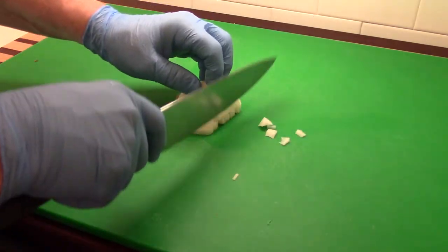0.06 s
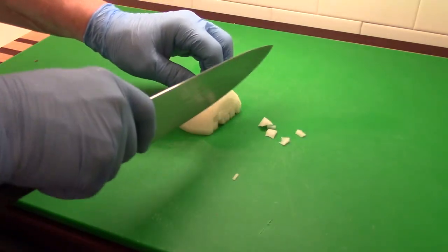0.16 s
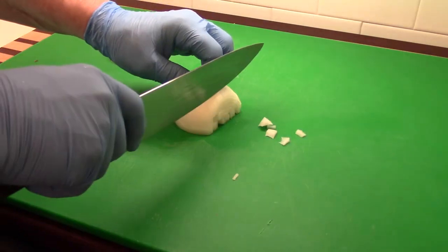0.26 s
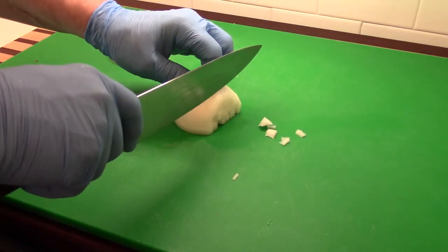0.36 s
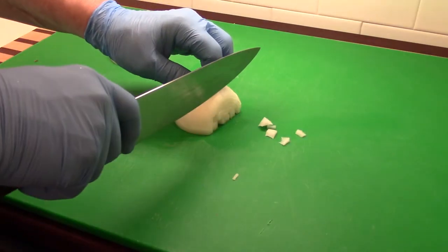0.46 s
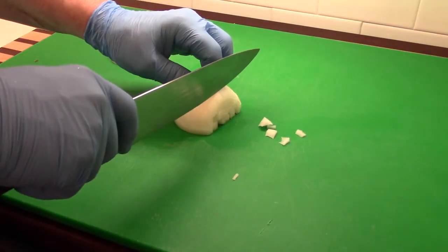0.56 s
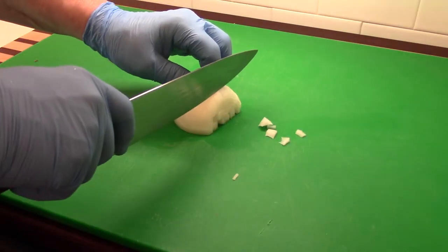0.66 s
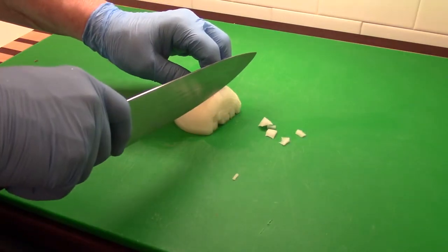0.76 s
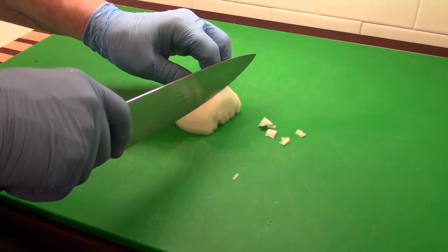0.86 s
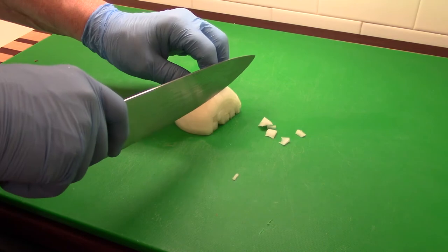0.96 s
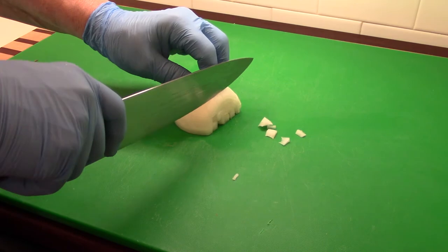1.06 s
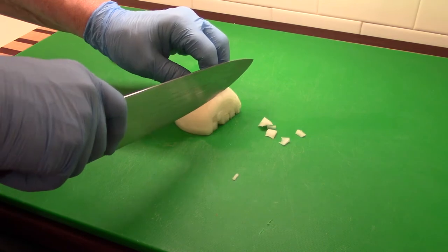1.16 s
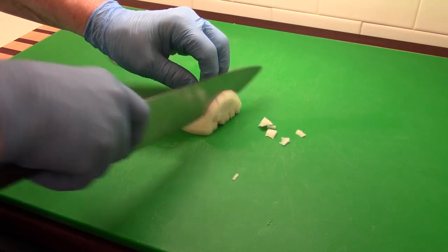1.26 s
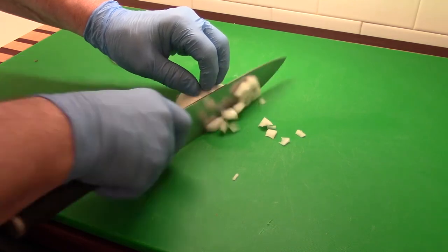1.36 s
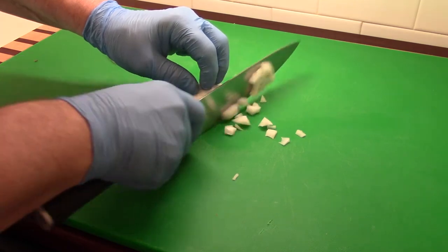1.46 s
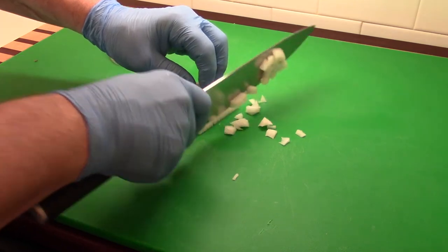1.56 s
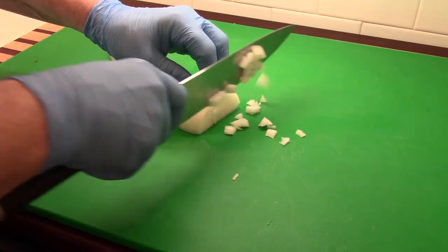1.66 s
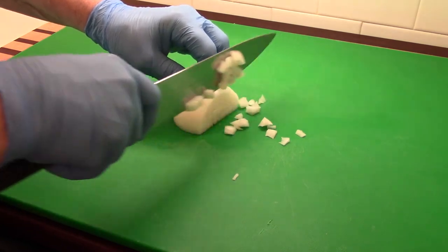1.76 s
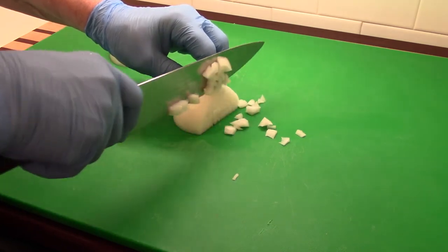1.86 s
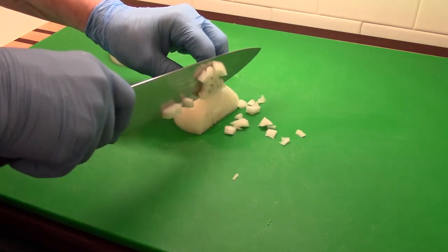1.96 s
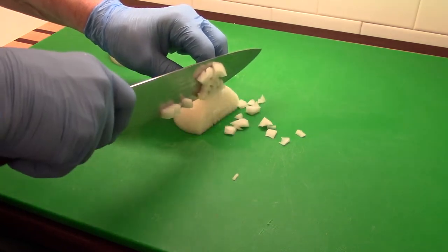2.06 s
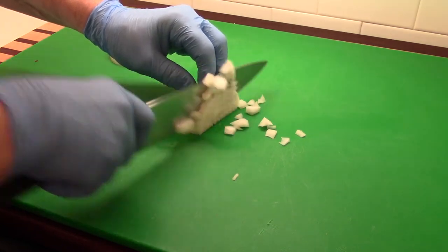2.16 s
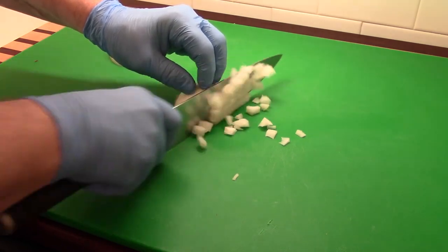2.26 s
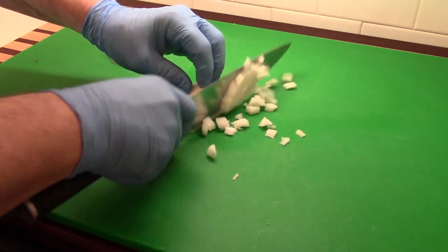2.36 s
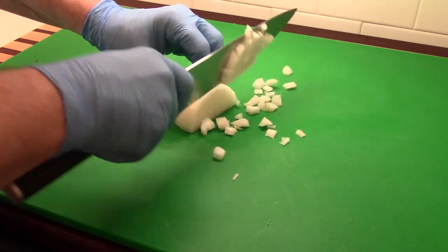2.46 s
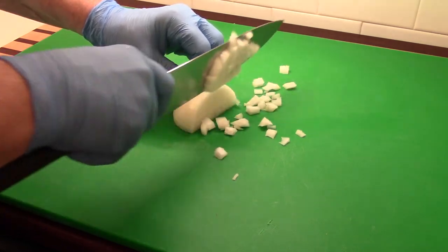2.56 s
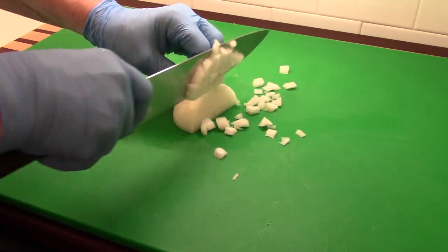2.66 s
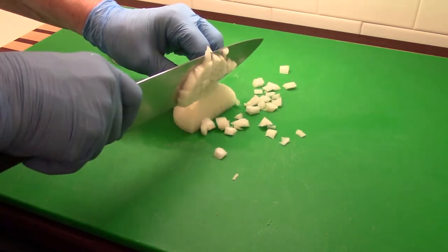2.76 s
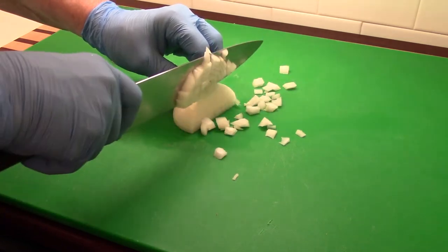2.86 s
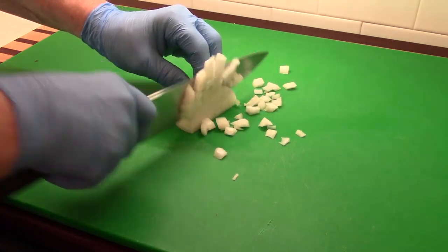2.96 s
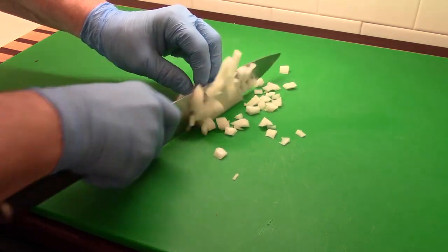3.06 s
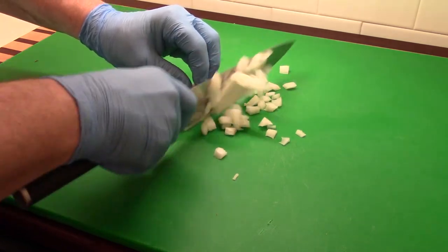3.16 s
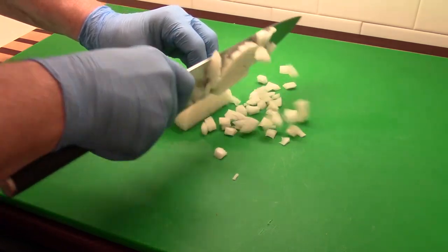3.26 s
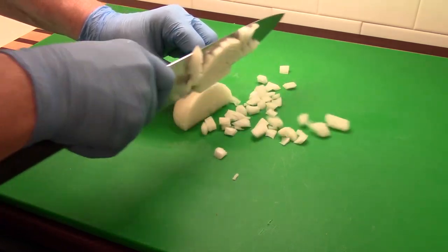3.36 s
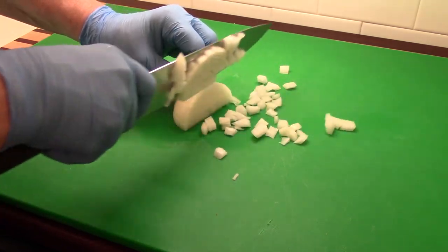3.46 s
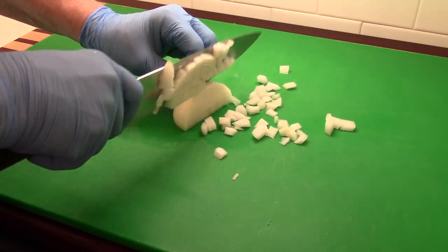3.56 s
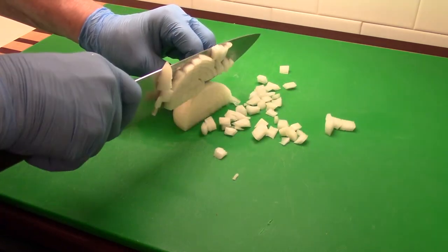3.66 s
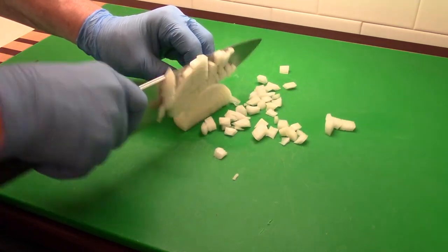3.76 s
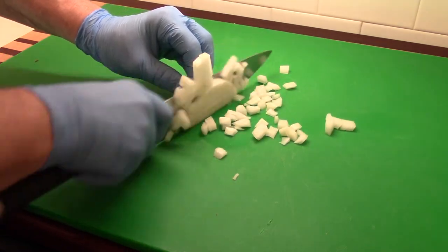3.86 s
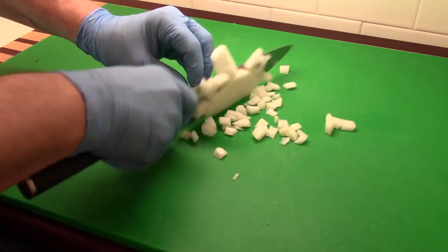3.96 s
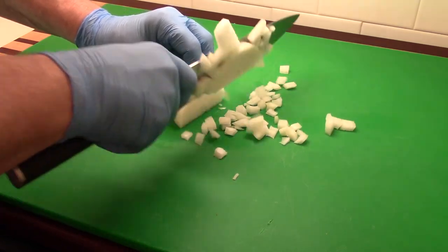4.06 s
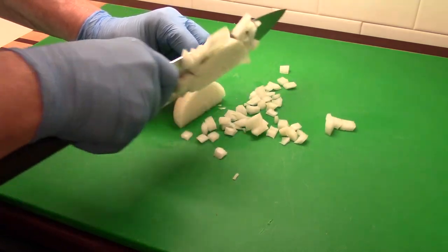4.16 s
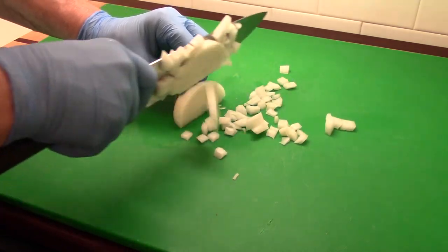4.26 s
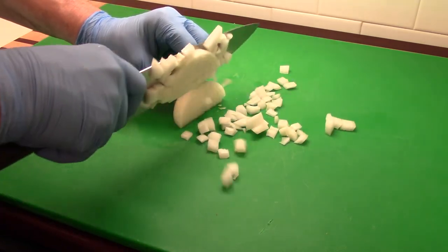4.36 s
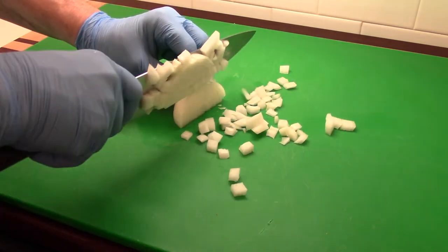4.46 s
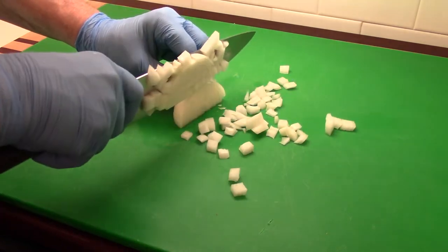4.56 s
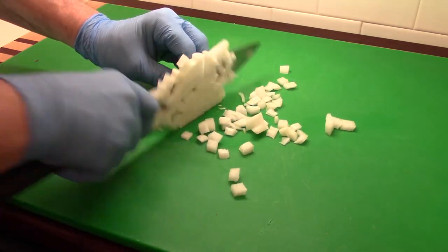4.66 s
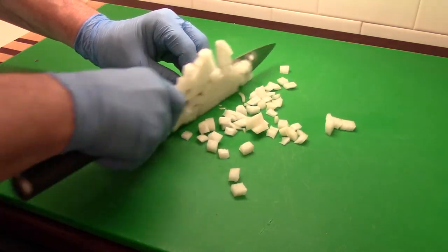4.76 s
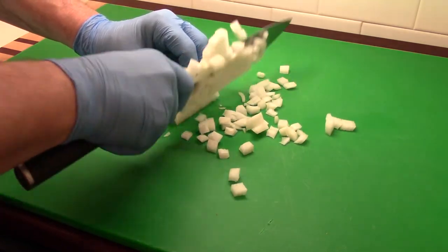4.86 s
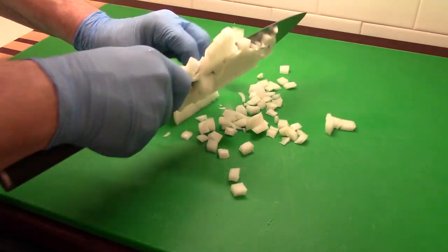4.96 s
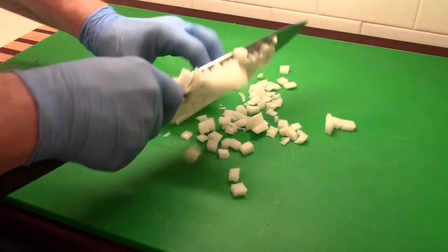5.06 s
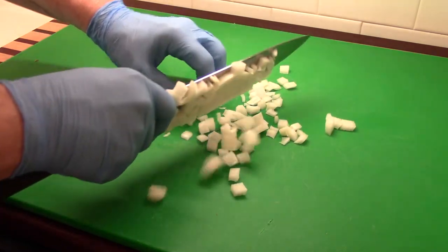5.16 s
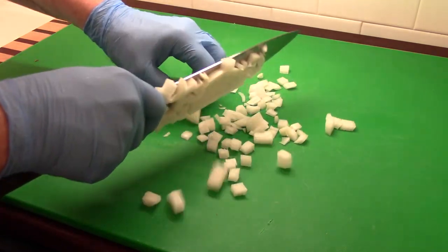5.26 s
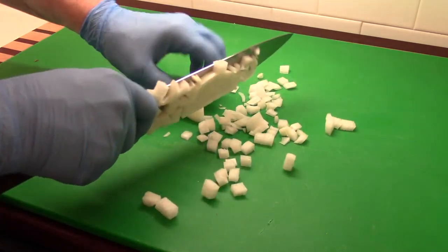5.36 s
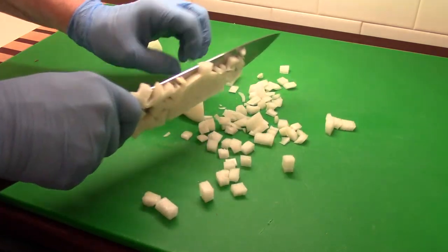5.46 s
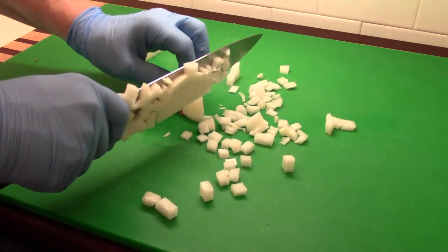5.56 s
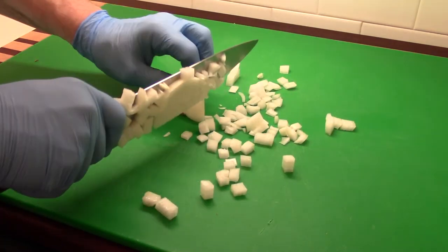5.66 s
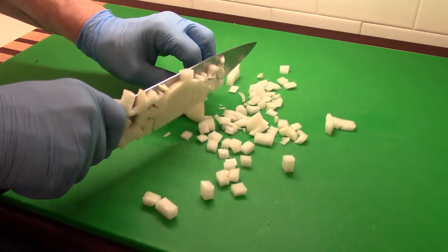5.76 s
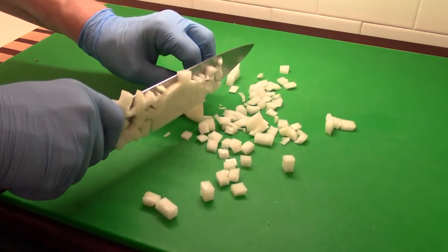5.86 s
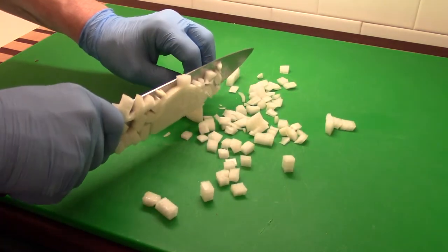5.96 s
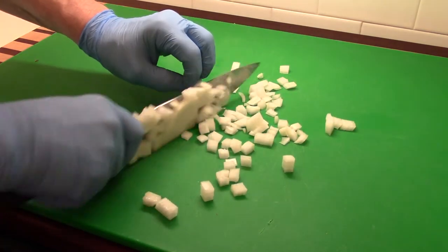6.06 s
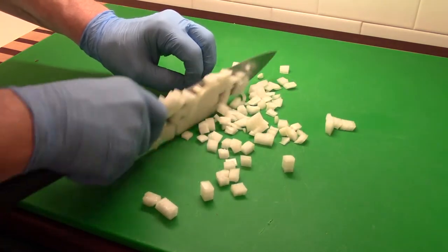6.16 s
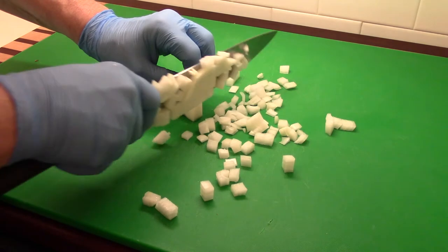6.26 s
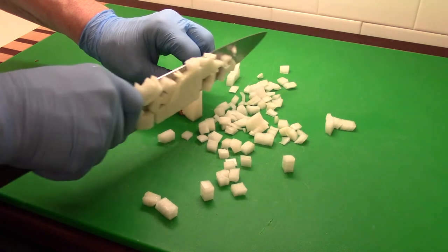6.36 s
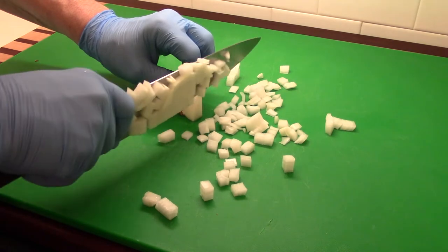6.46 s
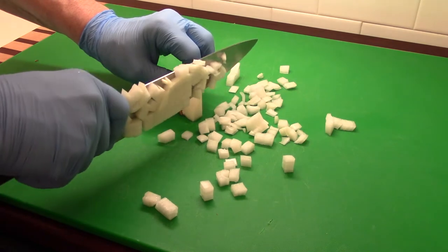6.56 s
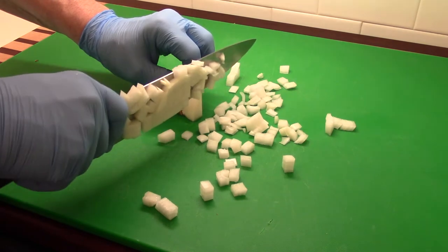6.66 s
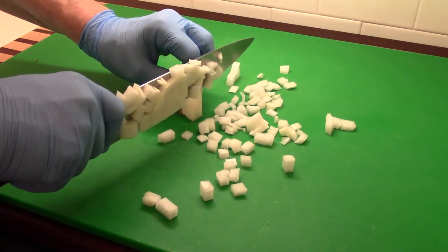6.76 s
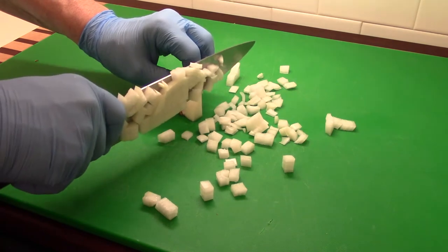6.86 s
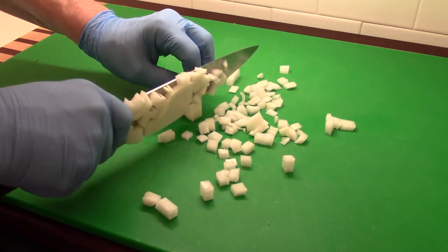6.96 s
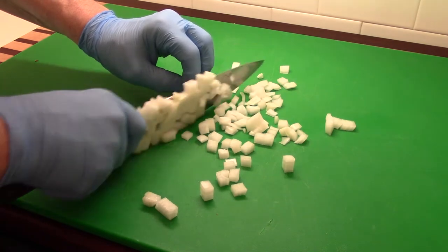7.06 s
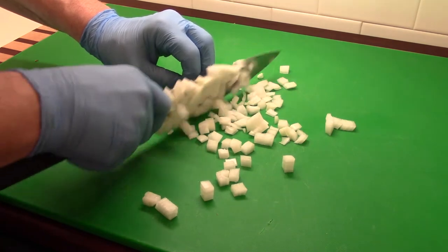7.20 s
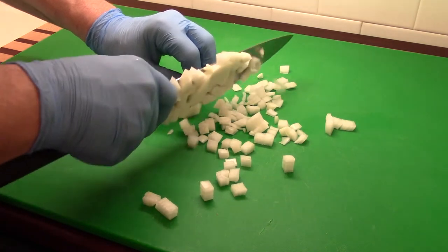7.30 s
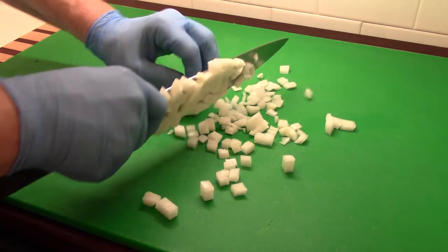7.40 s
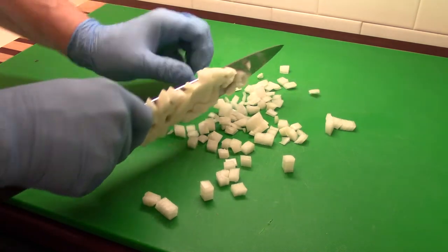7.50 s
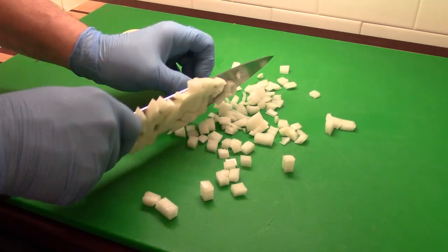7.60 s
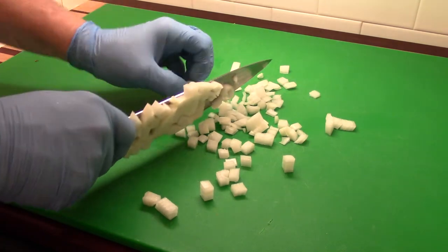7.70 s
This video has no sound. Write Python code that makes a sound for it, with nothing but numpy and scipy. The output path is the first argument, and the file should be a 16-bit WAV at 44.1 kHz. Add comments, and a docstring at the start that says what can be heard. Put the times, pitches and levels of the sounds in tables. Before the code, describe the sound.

A quiet small tiled kitchen, with low appliance rumble, faint hum and hiss. A light blade nick sounds at the very start, then almost nothing but a faint rub near 1.0 s. From 1.2 s the knife bites and crunches through the onion, hitting the plastic board at 1.35 s with a firm but softer knock. Louder hollow thocks follow at 2.2, 3.05, 3.9, 4.7, 6.1 and 7.1 s, each preceded by a tenth of a second or so of crisp, wet, crackling crunch with a slight steely edge. Worktop and room ring briefly after each. Sparse damp taps of dice follow the early cuts, then small clusters at 3.2-3.4, 4.1-4.5 and 5.0-5.3 s. After a longer pause, faint rubs come around 6.4 s. A piece taps at 7.35 s, and soft, low, rapid bounces thud close by at 7.5 s. Loud peaks are slightly rounded.

```python
"""A chef's knife makes seven unhurried cuts through an onion on a plastic board in a small tiled kitchen.
Each cut is shaped noise from tiny fractures: a bite, a crunch of cracking layers and bursting cells.
The edge then knocks on the board: damped modes plus a noise snap; worktop modes and the room ring on.
Dice and crumbs patter on the board as modal taps with wet slaps; near the end dice bounce on the table.
Rumble, hum and hiss lie beneath; overload rounds the peaks."""
import sys
import numpy as np
from scipy import signal
from scipy.fft import rfft, irfft, next_fast_len
from scipy.io import wavfile

SR = 44100
rng = np.random.default_rng(int(sys.argv[2]) if len(sys.argv) > 2 else 0)


def generate_wav(signal):
    """Clip the signal to [-1, 1] and save it as 16-bit WAV at the path in sys.argv[1]."""
    frames = np.transpose(np.atleast_2d(signal))
    scaled = np.clip(frames, -1, 1) * 32767
    pcm = np.round(scaled).astype(np.int16)
    wavfile.write(sys.argv[1], SR, pcm)


N = 340968
TIME = np.arange(N) / SR

# edge meets board: t/s, force/dB, tilt/(dB/octave), crack/dB
CHOPS = [(1.3466, -4, -1.1, -24), (2.2288, 2.5, 1.5, -26.5), (3.0452, 2, 2, -26), (3.873, 1.5, 0.6, -26),
         (4.7267, 1, 0.5, -27), (6.0764, -0.5, 0.6, -27), (7.085, 2, 2.5, -28.5)]
# dice landing on the board: t/s, tap/dB, wet slap/dB, tilt/(dB/octave)
DICE = [(1.73, -39.5, -59, 3), (1.884, -45.5, -65, -4), (2.518, -38.5, -60, 4), (3.236, -40, -48, -7),
        (3.262, -32.5, -52, -4.5), (3.32, -38.5, -60, -4), (3.355, -25, -58, 4.5), (3.406, -33.5, -49.5, 7),
        (4.105, -33.5, -46.5, 1.5), (4.328, -28, -43.5, 0), (4.365, -30, -48, 4), (4.385, -34, -50.5, 5),
        (4.447, -33.5, -56, 11), (4.469, -36.5, -56, 1), (5.022, -25.5, -47, 5.5), (5.053, -28.5, -37.5, 0),
        (5.148, -37, -68, 1), (5.176, -24.5, -41.5, -2.5), (5.223, -57, -48, 2), (5.283, -33.5, -59, 1.5),
        (5.309, -32, -51, 1), (7.363, -33, -52.5, 0.5)]
# damped modes of the board: f/Hz, level/dB, t60/s
BOARD_MODES = [(237.6, -14, 0.047), (333, -6.5, 0.019), (473, 12, 0.011), (649, 4.5, 0.019),
               (721.5, -2.5, 0.023), (828, -8, 0.061), (1020, 4, 0.017), (1149, -12.5, 0.022),
               (1376, -20, 0.064), (1690, -21.5, 0.033), (1830, -5.5, 0.008), (2505, -37, 0.044)]


def from_db(db):
    """Decibels to amplitude gain."""
    return 10 ** (np.asarray(db) / 20)


def rms_one(x):
    """Scale to an rms of 1."""
    return x / np.sqrt(np.mean(x ** 2) + 1e-20)


def at_hz(points, hz):
    """Interpolate a table on a log-frequency axis."""
    f, value = np.transpose(points)
    return np.interp(np.log(np.maximum(hz, 1)), np.log(f), value)


def add(track, s, sound):
    """Mix a sound into a track at time s."""
    start = max(int(s * SR), 0)
    track[start:start + len(sound)] += sound[:max(N - start, 0)]


def coloured(x, spectrum):
    """Filter noise by a table of gains over frequency; rms 1."""
    length = x.shape[-1]
    size = next_fast_len(length)
    hz = np.arange(size // 2 + 1) * SR / size
    shaped = rfft(x, size) * from_db(at_hz(spectrum, hz))
    return rms_one(irfft(shaped, size)[..., :length])


def low_pass(x, hz):
    """Second-order low-pass."""
    sos = signal.butter(2, min(hz, 0.45 * SR), fs=SR, output="sos")
    return signal.sosfilt(sos, x + 1e-18)


def dying(t, t60):
    """Exponential decay by 60 dB in t60."""
    return np.exp(-np.log(1000) * t / t60)


def ramp(start_s, length_s):
    """Linear rise from 0 to 1, then held."""
    return np.clip((TIME - start_s) / length_s, 0, 1)


def struck(modes, tilt_db, uneven_db, swell_s, polarity):
    """One blow: modes of randomly varied strength build up over the contact and decay."""
    hz, db, t60 = np.transpose(modes)
    t = TIME[:int(min(t60.max(), 1) * SR), None]
    tilt = tilt_db * np.log2(hz / hz.mean())
    gain = from_db(db + tilt + uneven_db * rng.standard_normal(len(hz)))
    signed_gain = gain * polarity ** np.arange(len(hz))
    decay = dying(t.astype(np.float32), t60.astype(np.float32))
    waves = np.sin((2 * np.pi * hz * t).astype(np.float32)) * decay
    return waves @ signed_gain * (1 - np.exp(-t[:, 0] / swell_s))


def tick(t60, rise_s):
    """A short snap of coloured noise."""
    # spectrum: f/Hz, level/dB
    tick_spectrum = [(700, 10), (1500, -2), (3000, 3), (5000, -1), (8000, -14.5), (11000, -24),
                     (15000, -32.5)]
    t = TIME[:SR // 12]
    noise = coloured(rng.standard_normal(len(t)), tick_spectrum)
    return noise * dying(t, t60) * (1 - np.exp(-t / rise_s))


def background():
    """Low rumble and hum of kitchen appliances, alike in both channels; separate hiss in each."""
    # noise spectra: f/Hz, level/dB
    rumble_spectrum = [(15, -20.5), (27, -0.5), (40, -17.5), (70, -15.5), (90, -21), (130, -16.5),
                       (165, -34.5), (300, -26.5), (400, -35), (570, -31), (750, -38.5), (1500, -45),
                       (4000, -55), (16000, -87)]
    hiss_spectrum = [(100, 0), (1500, -3), (4000, 1), (9000, -1.5), (12000, -3), (15500, -4)]
    # mains hum: f/Hz, rms level/dB
    hum_tones = [(59.5, -55), (119, -62)]
    rumble_db, hiss_db = -47.5, -64.5
    rumble = from_db(rumble_db) * coloured(rng.standard_normal(N), rumble_spectrum)
    hum = np.zeros(N)
    for hz, db in hum_tones:
        phase_cycles = rng.random()
        hum += from_db(db) * np.sqrt(2) * np.sin(2 * np.pi * (hz * TIME + phase_cycles))
    hiss = from_db(hiss_db) * coloured(rng.standard_normal((2, N)), hiss_spectrum)
    return rumble + hum + hiss


def blade(tilt_db):
    """Steel modes, damped by the onion to a brief ring."""
    # blade modes: f/Hz, level/dB
    blade_modes = [(2300, -17), (2650, 4.5), (2860, -5.5), (3400, -11), (4230, -3), (4480, -3.5),
                   (4800, -4.5), (6700, -16)]
    t60_s = 0.022
    modes = [(hz, db, t60_s) for hz, db in blade_modes]
    return struck(modes, tilt_db, uneven_db=1.5, swell_s=0.001, polarity=-1)


def touches():
    """The edge nicks the onion skin: a burst of noise excites the blade, a blow the board."""
    # nicks: t/s, steel/dB, board/dB
    nick_rows = [(0.002, -47.5, -23.5), (2.107, -49, -31), (2.783, -50, -38.5), (3.605, -40.5, -29),
                 (4.586, -43.5, -35), (6.011, -51.5, -30), (6.948, -52, -28.5)]
    t = TIME[:SR // 20]
    out = np.zeros(N)
    for s, steel_db, board_db in nick_rows:
        snaps = rng.standard_normal(len(t)) * dying(t, 0.047) * (1 - np.exp(-t / 0.003))
        steel = signal.fftconvolve(snaps, blade(tilt_db=5.0))
        board = struck(BOARD_MODES, tilt_db=-3.5, uneven_db=4.0, swell_s=0.0059, polarity=0.86)
        add(out, s, from_db(steel_db) * steel / np.abs(steel).max())
        add(out, s, from_db(steel_db) * tick(t60=0.071, rise_s=0.0013))
        add(out, s, from_db(board_db) * board)
    return out


def effort():
    """Crunch gain and blade depth (0-1): the edge bites, then sinks until the board stops it."""
    # one stroke per chop: bite t/s, bite level/dB, sink t/s, crunch level at board/dB, swell/dB
    stroke_rows = [(1.203, -63, 1.237, -48, 2.5), (2.101, -50, 2.13, -47, -4.5),
                   (2.891, -57, 2.914, -45, 4), (3.734, -57.5, 3.744, -44.5, 4),
                   (4.577, -53.5, 4.609, -43, 10.5), (5.968, -63, 6.01, -50.5, 9),
                   (6.940, -57, 6.99, -48.5, 16)]
    # light rubs along the onion between strokes: middle t/s, length/s, level/dB
    rub_rows = [(.992, 0.1, -70), (6.398, .11, -64.5), (6.469, 0.038, -68.5)]
    bite_attack_s, bite_hold_s, bite_t60_s = 0.0077, 0.012, 0.27
    sink_attack_s, stop_s = 0.033, 0.0039
    crunch, depth = np.zeros(N), np.zeros(N)
    for (bite_s, bite_db, sink_s, db, swell_db), (board_s, *_) in zip(stroke_rows, CHOPS):
        down = ramp(sink_s, board_s - sink_s)
        moving = 1 - ramp(board_s, stop_s)
        since_hold_s = np.maximum(TIME - bite_s - bite_attack_s - bite_hold_s, 0)
        bite = from_db(bite_db) * ramp(bite_s, bite_attack_s) * dying(since_hold_s, bite_t60_s)
        sink = from_db(db - swell_db * (1 - down)) * ramp(sink_s, sink_attack_s)
        crunch += moving * np.hypot(bite, sink)
        depth += moving * down
    for s, length_s, db in rub_rows:
        crunch += from_db(db) * np.sin(np.pi * ramp(s - length_s / 2, length_s)) ** 2
    return crunch, depth


def grains(per_s, spread_db):
    """Tiny fractures at random times, of uneven size and random sign."""
    size_db = spread_db * np.minimum(rng.exponential(1, N), 4)
    sizes = from_db(size_db) * rng.choice([-1, 1], N)
    return sizes * (rng.random(N) < per_s / SR)


def slicing():
    """Layers crack and cells burst, cells louder with depth; the jerks pass into blade and board."""
    # noise spectra: f/Hz, level/dB
    shake_spectrum = [(70, -12.5), (120, 6), (200, 1), (290, -1), (570, 1.5), (850, -3.5), (1300, -11),
                      (2500, -42)]
    cracking_spectrum = [(800, -21.5), (1500, 5.5), (2900, 8.5), (4700, 2.5), (7000, -8), (12000, -31)]
    bursting_spectrum = [(3000, -21), (6000, 6), (8000, 4), (10500, -1.5), (12500, -12.5), (15500, -28)]
    # board shake under a firm crunch; dB of shake per dB of crunch
    shake_db, firm_crunch_db, shake_per_crunch = -38.5, -45, 0.74
    burst_db, burst_growth_db = -13, 4.5  # growth over the full depth
    steel_db = -13  # blade ring relative to cracking
    crunch, depth = effort()
    # the blade sticks and gives way
    jerks = from_db(1.5 * rms_one(low_pass(rng.standard_normal(N), hz=70)))
    shake = from_db(shake_db) * coloured(grains(per_s=1200, spread_db=0.5), shake_spectrum)
    cracks = grains(per_s=3000, spread_db=2.0)
    steel = rms_one(signal.fftconvolve(cracks, blade(tilt_db=5.5))[:N])
    cracking = coloured(cracks, cracking_spectrum) + from_db(steel_db) * steel
    burst_gain = from_db(burst_db + burst_growth_db * depth)
    bursting = burst_gain * coloured(grains(per_s=8900, spread_db=1.0), bursting_spectrum)
    shake_gain = (crunch / from_db(firm_crunch_db)) ** shake_per_crunch
    return jerks * (shake_gain * shake + crunch * (cracking + bursting))


def chops():
    """The edge cracks onto the board and pushes it down: board modes plus a noise snap."""
    out = np.zeros(N)
    for s, db, tilt_db, crack_db in CHOPS:
        knock = struck(BOARD_MODES, tilt_db, uneven_db=3.37, swell_s=0.0021, polarity=0.92)
        add(out, s, -from_db(db) * knock)
        add(out, s, from_db(crack_db) * tick(t60=0.017, rise_s=0.0003))
    return out


def worktop():
    """Chops and dice excite the worktop under the board; its upper modes die sooner."""
    # worktop modes: f/Hz, level/dB
    worktop_modes = [(147, -29), (188, -32.5), (297, -24.5), (335, -39.5), (362, -24.5), (386, -29),
                     (425, -21.5), (466, -31.5), (494, -16), (557, -14.5), (594, -12), (622, -20),
                     (700, -29), (730, -34), (768, -38.5), (846, -34.5), (935, -24), (965, -31.5),
                     (1031, -42), (1115, -30), (1150, -34.5), (1198, -28.5), (1380, -41), (1460, -40),
                     (1530, -32), (1620, -42), (1710, -38), (1820, -36.5), (1950, -51), (2090, -45.5)]
    low_t60_s = 0.39
    chop_share_db, dice_share_db = -4.5, -2
    modes = [(hz, db, low_t60_s / (1 + (hz / 3200) ** 2)) for hz, db in worktop_modes]
    out = np.zeros(N)
    for s, db, tilt_db, _ in CHOPS:
        ring = struck(modes, tilt_db, uneven_db=2.0, swell_s=0.0054, polarity=-0.954)
        add(out, s, from_db(db + chop_share_db) * ring)
    for s, db, *_ in DICE:
        ring = struck(modes, tilt_db=1.0, uneven_db=3.5, swell_s=0.0014, polarity=-0.941)
        add(out, s, from_db(db + dice_share_db) * ring)
    return out


def crumbs():
    """One faint landing at a random time after each chop, in rows like DICE."""
    after_s, tap_db, slap_db = (0.11, 0.65), -40.5, -62
    return [(s + rng.uniform(*after_s), tap_db, slap_db, 0) for s, *_ in CHOPS]


def plop(hz, cycles):
    """A wet face slaps flat: a sine that decays by 60 dB in the given cycles."""
    t = TIME[:SR // 12]
    return np.sin(2 * np.pi * hz * t) * dying(t, cycles / hz) * (1 - np.exp(-t * hz))


def patter():
    """A wet piece taps the board, then tips over for a weaker second tap; mode strengths vary."""
    plop_hz, plop_db = (1096, 2600), 7  # pitch range; gain relative to the snap
    tip_after_s, tip_db = (0.004, 0.016), -8.5
    out = np.zeros(N)
    for s, db, wet_db, tilt_db in DICE + crumbs():
        for delay_s, loss_db in ((0, 0), (rng.uniform(*tip_after_s), tip_db)):
            tap = struck(BOARD_MODES, tilt_db, uneven_db=3.0, swell_s=0.0024, polarity=0.98)
            ring = from_db(plop_db) * plop(rng.uniform(*plop_hz), cycles=24)
            slap = ring + tick(t60=0.04, rise_s=0.0017)
            add(out, s + delay_s, from_db(db + loss_db) * tap)
            add(out, s + delay_s, from_db(wet_db + loss_db) * slap)
    return out


def table_bounces():
    """Dice bounce on the table close to the microphone: soft contact, low damped modes, short thuds."""
    # bounces: t/s, force/dB
    bounce_rows = [(7.497, -27.5), (7.504, -36), (7.515, -30.5), (7.531, -37)]
    # thud modes: f/Hz, level/dB, t60/s
    thud_modes = [(170.5, -6.5, 0.035), (375, 3, 0.016), (610, -6, 0.016)]
    out = np.zeros(N)
    for s, db in bounce_rows:
        thud = struck(thud_modes, tilt_db=0, uneven_db=1, swell_s=0.0006, polarity=1)
        add(out, s, from_db(db) * thud)
    return out


def kitchen(x):
    """Direct sound, a few dull reflections and a diffuse noise tail that dies band by band."""
    # reflections off tiles and ceiling: delay/s, level/dB
    echo_rows = [(0.015, -13), (.0262, -44), (.047, -16.5)]
    # reverberation level: f/Hz, level/dB
    room_db = [(100, -11), (300, -6.5), (600, -8), (1000, -6), (1400, -4), (1900, -2), (2700, -12),
               (5000, -8), (10000, -19)]
    # reverberation time: f/Hz, t60/s
    room_t60 = [(100, 0.42), (600, 0.46), (1500, 0.41), (4000, 0.8), (10000, 0.31)]
    t = TIME[:SR * 3 // 5]
    onset = 1 - np.exp(-(t / 0.0031) ** 2)
    edges_hz = 70 * 2 ** (np.arange(13) * 2 / 3)
    response = np.zeros(len(t))
    for low, high in zip(edges_hz, edges_hz[1:]):
        hz = np.sqrt(low * high)
        sos = signal.butter(2, [low, high], "band", fs=SR, output="sos")
        band = signal.sosfilt(sos, rng.standard_normal(len(t)))
        tail = band * dying(t, at_hz(room_t60, hz)) * onset
        # energy in proportion to bandwidth
        level = np.sqrt(2 * (high - low) / SR / np.sum(tail ** 2))
        response += tail * from_db(at_hz(room_db, hz)) * level
    dull = low_pass(x, hz=2960)
    echoes = sum(from_db(db) * np.interp(TIME - s, TIME, dull, left=0) for s, db in echo_rows)
    return x + echoes + signal.fftconvolve(x, response)[:N]


def scene():
    """Knife and dice in the kitchen, alike in both channels; worktop and background join."""
    knife_and_dice = chops() + slicing() + patter() + touches() + table_bounces()
    return kitchen(knife_and_dice) + worktop() + background()


def record(dry):
    """Microphone overload rounds peaks, negative ones sooner; a steep low-pass cuts the top."""
    cutoff_hz = 15700
    limit = np.where(dry > 0, 0.6, 0.5)
    rounded = dry / (1 + (dry / limit) ** 6) ** (1 / 6)
    sos = signal.ellip(12, 0.1, 90, cutoff_hz, fs=SR, output="sos")
    return signal.sosfilt(sos, rounded)


dry = scene()
out = record(dry)
generate_wav(out)
```